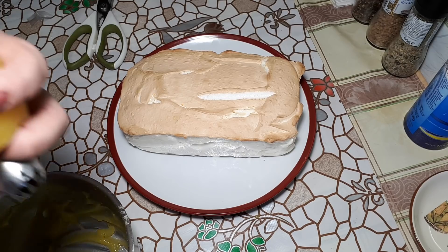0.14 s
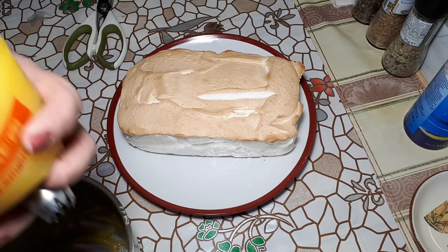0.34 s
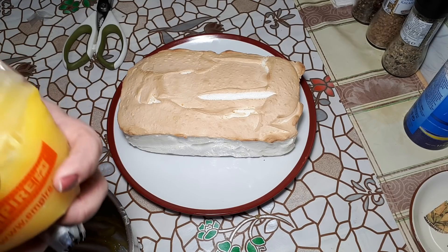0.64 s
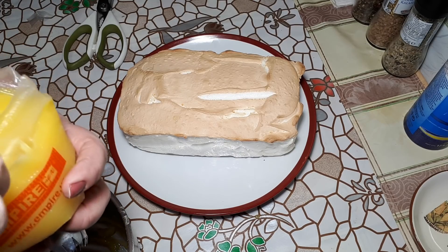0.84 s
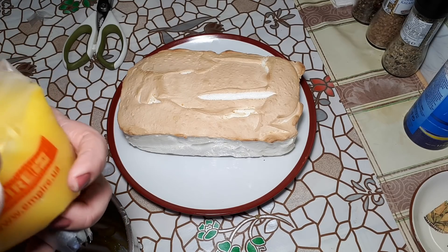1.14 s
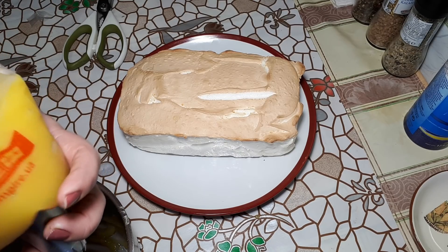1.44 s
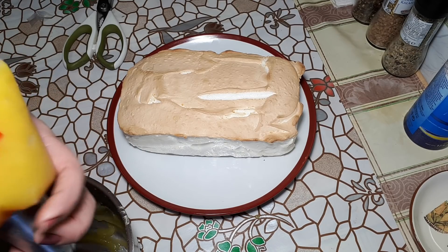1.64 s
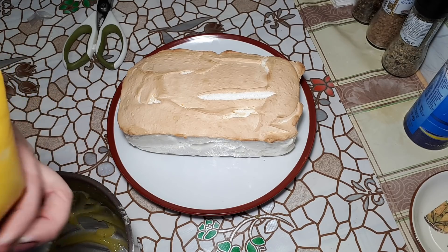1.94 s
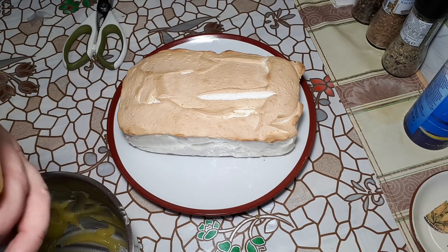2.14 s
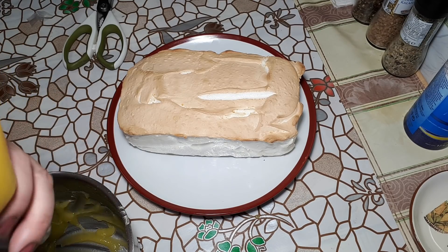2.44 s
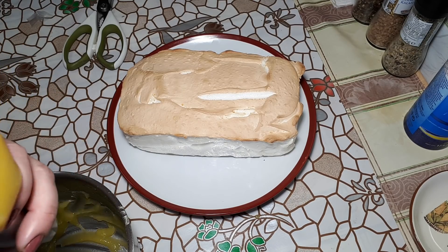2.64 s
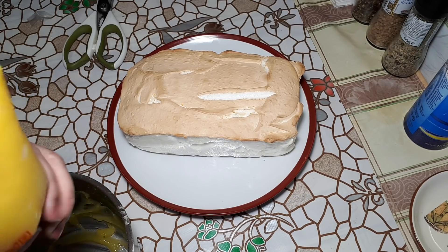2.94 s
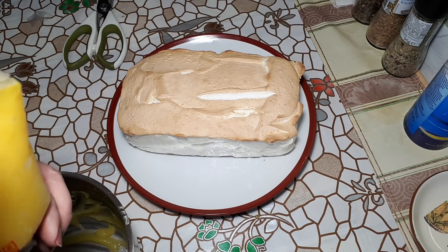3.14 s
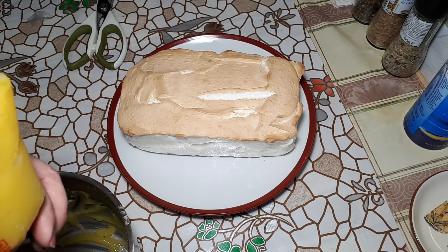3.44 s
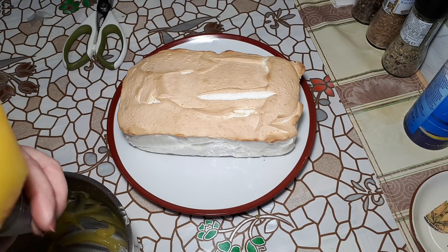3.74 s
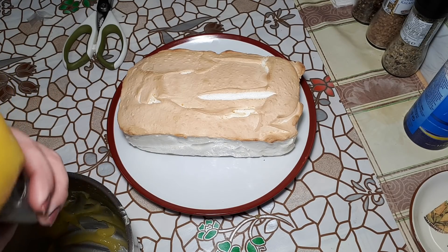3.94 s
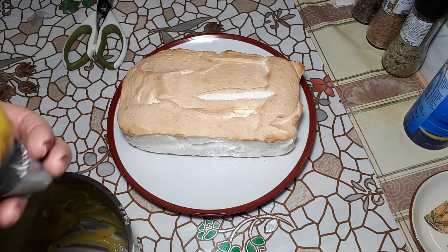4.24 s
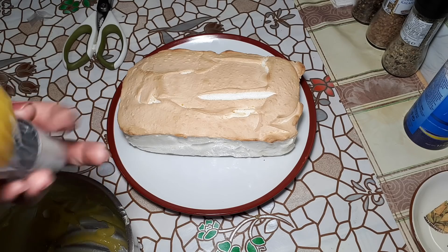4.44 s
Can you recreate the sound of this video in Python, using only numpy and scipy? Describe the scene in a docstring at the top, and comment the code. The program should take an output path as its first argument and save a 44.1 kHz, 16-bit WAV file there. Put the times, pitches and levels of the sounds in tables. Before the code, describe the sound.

Hands work a thin plastic piping bag filled with custard, close to a stereo microphone and slightly left, in a small tiled kitchen. A sharp crunch opens it, scattered ticks follow, then denser crackling builds to firm crunches around three seconds, with busy bright snapping afterwards that eases toward the end. Faint room rumble and hiss lie underneath.

```python
"""Hands squeeze and turn a thin plastic bag full of custard, just left of a pair of microphones in a kitchen.
Creases in the film snap one by one or in dense swarms: each is a burst of noise that rings a patch of film
and scatters off hands and table. The tiled table and the small room throw the sound back as sparse echoes.
A low household rumble with a faint hiss, made of shaped noise, lies underneath."""
import sys
import numpy as np
from scipy import signal
from scipy.fft import rfft, irfft
from scipy.io import wavfile
from scipy.ndimage import uniform_filter1d

SR = 44100
rng = np.random.default_rng(int(sys.argv[2]) if len(sys.argv) > 2 else 0)


def unload_wav(signal):
    """Save mono or channel-first audio to the path in sys.argv[1] as 16-bit WAV at rate SR, clipped to [-1, 1]."""
    wavfile.write(
        sys.argv[1],
        SR,
        np.round(np.clip(np.atleast_2d(signal).T, -1, 1) * 32767).astype(np.int16),
    )


N = 202418

# weight of the low body of the full bag against the film: t/s, level/dB
BODY_WEIGHT = [(0, -9), (.35, -8.5), (.55, -12.5), (.85, -8), (1.25, -5), (1.45, -12.5), (2.0, -9.5),
               (2.85, -9), (2.93, -15.5), (3.02, -11.5), (3.14, -14.5), (3.18, -23), (3.36, -7.5),
               (3.45, -27), (3.53, -15.5), (3.84, -9.5), (4.1, -11.5), (4.25, -10.5), (4.59, -9)]


def gain_of(db):
    """Amplitude factor for a level in dB."""
    return 10 ** (np.asarray(db) / 20)


def evened(x):
    """Scale a signal to an RMS of one."""
    return x / np.sqrt(np.mean(x ** 2) + 1e-20)


def along(curve, s):
    """Read a time curve at s seconds, with straight lines between its points."""
    return np.interp(s, *np.transpose(curve))


def read(points, hz):
    """Read a frequency curve, with straight lines on a log-frequency axis."""
    f, value = np.transpose(points)
    return np.interp(np.log(hz + 1), np.log(f + 1), value)


def shelves(hz, treble_db, thud_db):
    """Smooth lifts of the top and of the bottom of the spectrum, in dB."""
    treble = treble_db / (1 + (6000 / (hz + 1)) ** 6)
    thud = thud_db / (1 + (hz / 1650) ** 5)
    return treble + thud


def coloured(x, db):
    """Causal minimum-phase filter; db is on an even grid from zero to half the sample rate."""
    log_gain = np.log(gain_of(np.maximum(db, -100)))
    circle = np.concatenate([log_gain, log_gain[-2:0:-1]])
    phase = -signal.hilbert(circle).imag
    taps = np.fft.ifft(np.exp(circle + 1j * phase)).real
    return signal.oaconvolve(x, taps[:len(db)])[:len(x)]


def twin(a, b):
    """Film radiates its treble unevenly: mix a and b so the result resembles a less towards the top."""
    # likeness of the two channels: f/Hz, share (0 to 1)
    film_likeness = [(300, 1), (1500, 0.75), (4000, 0.26), (12000, 0.06)]
    same = np.clip(read(film_likeness, np.fft.rfftfreq(len(a), 1 / SR)), 0, 1)
    return irfft(same * rfft(a) + np.sqrt(1 - same ** 2) * rfft(b), len(a))


def snap(hz, treble_db, thud_db, tear_ms, ring_db=6, width=0.14, focus_db=5, bounce_db=-7, bounce_t60=0.032):
    """One crease flips: sharp ticks ring a patch of film, then scatter off hands and table."""
    t = np.arange(1536) / SR
    tick_a, tick_b, bounce_a, bounce_b, slip = rng.standard_normal((len(t), 5)).T

    tear = t / (np.clip(tear_ms, .1, 30) / 1000)
    swell = tear * np.exp(-tear ** 1.4)  # the tear gathers, then stops short
    shape = swell * abs(slip) ** .8  # some slips are far larger than the rest
    dying = gain_of(-60 * t / bounce_t60) * np.minimum(t / 0.0065, 1)
    dying = dying / np.linalg.norm(dying)

    f = np.fft.rfftfreq(512, 1 / SR)
    away = np.log((f + 1) / hz)
    patch = ring_db * np.exp(-.5 * (away / width) ** 2) + shelves(f, treble_db, thud_db)
    patch += focus_db * np.exp(-.5 * (away / 0.83) ** 2)  # a wide band around the ring sounds along
    # each snap made here gets its own random ripple of colour
    patch += 2.9 * evened(uniform_filter1d(rng.standard_normal(len(f)), size=9))

    left = (shape * tick_a, bounce_a)
    right = (shape * twin(tick_a, tick_b), twin(bounce_a, bounce_b))
    pair = []
    for direct, scatter in (left, right):
        scatter = gain_of(bounce_db) * scatter * dying
        bounced = signal.fftconvolve(direct, scatter)[:len(t)]
        sound = coloured(direct + bounced, patch)
        pair.append(sound / np.linalg.norm(sound))
    fade_out = signal.windows.tukey(2 * len(t), .3)[len(t):]
    return np.array(pair) * fade_out


def heard(x):
    """Film colour and resonances, the colour of each port, and the later arrival at the right one."""
    # overall colour of the film: f/Hz, level/dB
    film_colour = [(88, -72.5), (150, -19), (354, -17.5), (534, -9.5), (960, -6), (1830, -3.5),
                   (2220, -5.5), (2650, -0.5), (5460, -6), (7470, -5.5), (9080, -11), (15100, -7.5),
                   (16000, -44)]
    # resonances of bag and table: f/Hz, width/Hz, boost/dB
    resonances = [(510, 335, 5.5), (1850, 910, 6), (2520, 150, 3.5), (4690, 1300, 5.5), (7520, 300, 4)]
    # the two microphone ports differ in colour: f/Hz, left minus right/dB
    port_lean = [(60, -23), (110, 8.5), (200, -0.5), (380, 12), (700, -1), (1290, 0.5), (2380, 1),
                 (4400, 1), (8120, -2), (15000, 2.5)]
    hz = np.fft.rfftfreq(4096, 1 / SR)
    db = read(film_colour, hz)
    for f, w, boost in resonances:
        db = db + boost / (1 + (2 * (hz - f) / w) ** 2)
    half_lean = read(port_lean, hz) / 2
    left = coloured(x[0], db + half_lean)
    right = coloured(x[1], db - half_lean)
    right_late = 13  # samples
    return np.array([left, np.pad(right, (right_late, 0))[:N]])


def rustle(count=40):
    """Many small creases at random moments, in clumps; a firm grip packs them into a dense crunch."""
    # how hard the fingers work the film, as swarm level ahead of the tone lifts: t/s, level/dB
    grip_curve = [(0.0, -32.5), (0.16, -56.5), (0.3, -41), (0.46, -68.5), (0.66, -60.5), (0.8, -48),
                  (0.9, -53), (1.12, -43), (1.2, -55), (1.34, -75), (1.54, -65.5), (1.66, -50), (1.84, -52),
                  (1.98, -54.5), (2.12, -47), (2.26, -50.5), (2.38, -41.5), (2.5, -44.5), (2.57, -41),
                  (2.7, -48.5), (2.717, -31.5), (2.84, -38), (2.89, -45.5), (2.96, -42), (3.01, -29.5),
                  (3.14, -30.5), (3.18, -39), (3.27, -41.5), (3.31, -54.5), (3.46, -49.5), (3.52, -34),
                  (3.7, -39.5), (3.75, -43.5), (3.84, -38), (3.89, -47.5), (4.2, -49.5), (4.27, -53),
                  (4.5, -49.5), (4.59, -54)]
    # treble and thud at which the film colour holds as it is: treble/dB, thud/dB
    usual_treble_db, usual_thud_db = (-5, -11)

    grip_db = along(grip_curve, np.arange(N) / SR)
    # mean creases per second: 600 at a -47 dB grip, more as the grip gets louder
    rate = np.clip(600 * np.exp(0.12 * (grip_db + 47.0)), 100, 15000)
    drift = uniform_filter1d(uniform_filter1d(rng.standard_normal(N), 350), 350)
    clumps = gain_of(5.5 * evened(drift))
    comes = rng.random(N) < rate / SR * clumps / clumps.mean()
    size_db = 3 * np.minimum(rng.exponential(1, N), 3.5)  # mostly small, a few large
    size = comes * gain_of(size_db) * rng.choice([-1, 1], N)
    size = size / np.sqrt(rate)  # more creases share the same energy

    # the creases share a stock of snap sounds
    kind, out = rng.integers(0, count, N), np.zeros((2, N))
    for k, hz in enumerate(np.geomspace(500, 12000, count)):
        one = snap(hz, 11.7 * rng.standard_normal(), 0, rng.uniform(0.56, 2.33), ring_db=4.5)
        both = signal.oaconvolve((size * (kind == k))[None], one, axes=1)
        out += both[:, 256:N + 256]  # the swarm is already under way at the start

    hz, frames, z = signal.stft(evened(heard(out)), SR, nperseg=256)
    hz = hz[:, None]
    level_db = along(grip_curve, frames)
    treble_db = -0.5 + 0.18 * (level_db + 45)  # a firmer grip is brighter
    thud_db = along(BODY_WEIGHT, frames)
    lift = shelves(hz, treble_db - usual_treble_db, thud_db - usual_thud_db)
    lift += 0.57 * (level_db + 38.0) / (1 + (hz / 330) ** 6)  # a hard squeeze moves the custard
    swarm = signal.istft(z * gain_of(lift), SR, nperseg=256)[1][:, :N]
    return swarm * gain_of(grip_db)


def hush():
    """Low rumble of the house over a faint hiss: steady noise, most alike in both channels near 100 Hz."""
    # spectrum ahead of the overall level: f/Hz, level/dB
    rumble_colour = [(20, -17), (60, -10), (100, 4.5), (170, -7), (400, -9.5), (2000, -17.5), (8000, -17.5),
                     (16000, -29.5)]
    # likeness of the two channels: f/Hz, share (-1 to 1)
    rumble_likeness = [(30, .35), (100, 0.69), (600, .1)]
    hz = np.fft.rfftfreq(2048, 1 / SR)
    a, b, c, d = rng.standard_normal((N // 512 + 5, len(hz), 4)).T
    same = np.clip(read(rumble_likeness, hz), -1, 1)[:, None]
    left = a + 1j * b
    right = same * left + np.sqrt(1 - same ** 2) * (c + 1j * d)
    z = np.array([left, right]) * gain_of(read(rumble_colour, hz))[:, None]
    noise = signal.istft(z, nperseg=2048, noverlap=1536)[1][:, :N]
    return gain_of(-68) * evened(noise)


def snaps():
    """Single creases, from loud snaps to faint ticks in the lulls; a longer tear carries more energy."""
    # single creases, level ahead of tear energy and film colour:
    # t/s, level/dB, pitch of the film patch f/Hz, treble/dB, length of the tear/ms
    single_creases = [(0.0078, -17, 1710, 2.5, 1.4), (0.015, -24, 1850, -2, 1.1),
                      (0.0703, -31.5, 1750, -12, 2.6), (0.0953, -26.5, 1630, 3, 0.31),
                      (0.123, -36, 1570, -28, 0.7), (0.183, -35, 1770, -6, 1.9),
                      (0.2054, -31.5, 2470, -4.5, 1.9), (0.2134, -30.5, 2560, -3, 0.6),
                      (0.2347, -26, 2370, 1, 3), (0.2621, -21.5, 2400, 8, 2.3), (0.293, -36, 7450, 6, 3.6),
                      (0.333, -27.5, 1630, 4, 1.5), (0.3514, -16, 1820, 3, 0.31),
                      (0.3618, -30, 7840, -11, 1.6), (0.4128, -26.5, 7440, 0.5, 1.44),
                      (0.442, -46, 1590, -34, 2.6), (0.483, -46.5, 1850, -50, 1.7),
                      (0.524, -38.5, 2640, 8, 3), (0.532, -23, 2540, -2, 0.36),
                      (0.5438, -39, 3300, -2, 0.75), (0.5832, -27.5, 3620, -4, 1.02),
                      (0.6166, -47.5, 1820, -25, 2.4), (0.6766, -37.5, 1550, -3, 7.3),
                      (0.7412, -40.5, 7540, -1, 3.1), (0.775, -32, 1900, -3, 0.99),
                      (0.839, -35.5, 4830, 0, 2.3), (0.8633, -39, 1770, 1.5, 6.7),
                      (0.901, -39, 3320, 2, 3.2), (0.943, -36.5, 2870, 4, 2.8),
                      (0.9643, -32, 3330, -2, 1.3), (0.9725, -32, 4690, 2.5, 6.4),
                      (1.0454, -29.5, 4160, 8, 0.96), (1.0829, -27, 4200, -1, 0.48),
                      (1.0896, -27.5, 1810, 1, 2.3), (1.1233, -32.5, 1570, 0.5, 5.1),
                      (1.1492, -40, 2880, -12, 0.92), (1.2217, -39.5, 2900, -4, 1.7),
                      (1.261, -36, 3220, -3.5, 4), (1.382, -45, 7100, -3, 0.94),
                      (1.4212, -35, 7600, -1, 1.24), (1.4677, -37.5, 7450, 21, 0.35),
                      (1.496, -66, 2500, -15, 4), (1.544, -59, 1890, -22, 2.1), (1.595, -36, 3150, -6, 2.4),
                      (1.629, -40.5, 4470, -4, 4.3), (1.6544, -35, 4130, -10.5, 0.85),
                      (1.6814, -31, 1850, -3, 0.45), (1.7328, -38, 4680, -3, 1.6),
                      (1.7681, -30, 3270, -12, 0.41), (1.781, -27, 12300, 8, 0.59),
                      (1.8243, -28.5, 1950, 1.5, 1.7), (1.8732, -38, 10680, -3.5, 4.5),
                      (1.946, -40, 2520, -2, 2.6), (2.0016, -54, 600, -22, 4.1),
                      (2.0184, -41, 1700, -24, 0.63), (2.0418, -30.5, 1850, -1.5, 1.06),
                      (2.1058, -18.5, 4970, 6.5, 0.4), (2.1919, -30, 2420, 14, 2.3),
                      (2.2309, -39, 2370, -24, 1.9), (2.2395, -41, 2220, -10, 0.75),
                      (2.2546, -42, 2110, -1, 2.3), (2.282, -28, 7600, 3, 0.7), (2.296, -30, 7490, 12, 1.3),
                      (2.3071, -25.5, 4670, 3.5, 1.4), (2.3108, -23, 2200, 3.5, 4.2),
                      (2.3268, -26, 950, -17, 0.77), (2.3911, -21, 8200, 1, 0.47),
                      (2.4475, -25.5, 3150, -5, 1.04), (2.4515, -23.5, 2440, 1, 0.56),
                      (2.5581, -33.5, 1920, -6, 3.9), (2.5904, -33, 1800, -42, 0.52),
                      (2.623, -33.5, 2500, 2, 2.1), (2.6492, -35.5, 2070, -22, 1.1),
                      (2.6744, -29.5, 3930, 0.5, 2), (2.7126, -24.5, 2630, -14, 1),
                      (2.7296, -26.5, 2120, -2, 2.9), (2.7739, -39, 2770, -26, 3),
                      (2.8123, -23.5, 2670, -6, 1.1), (2.871, -38.5, 3340, -3, 4.3),
                      (2.9049, -39, 2580, -13, 1), (2.9264, -27.5, 1970, -4.5, 1.1),
                      (2.9333, -31.5, 1960, -0.5, 2.4), (3.005, -27, 2470, -32, 3.1),
                      (3.0474, -26, 2610, -6.5, 4.3), (3.0747, -21, 7640, -16, 2.1),
                      (3.1357, -18, 3380, -1, 0.7), (3.2564, -27.5, 1850, -4, 0.84),
                      (3.307, -36, 7800, -12.5, 1.9), (3.349, -41, 3430, -4, 1.8),
                      (3.3711, -38.5, 3930, -1.5, 2.1), (3.4044, -32.5, 2700, -4, 0.83),
                      (3.43, -32.5, 7200, -3, 2.5), (3.4814, -29.5, 2610, -4, 2.6),
                      (3.5176, -20.5, 4140, 7, 0.97), (3.5343, -21.5, 11300, 6, 3.9),
                      (3.555, -28, 7700, 2, 2.4), (3.5662, -31, 3600, -2, 1.5), (3.5825, -27.5, 6740, 2, 2),
                      (3.594, -28, 3640, 9, 5.9), (3.631, -32, 6050, 1, 2.8),
                      (3.6609, -22.5, 4430, 0.5, 1.9), (3.6762, -29.5, 2730, -0.5, 5.2),
                      (3.698, -22, 2180, -3, 1.6), (3.754, -32, 4760, -1, 1.2),
                      (3.7882, -24, 1670, 16, 1.3), (3.818, -23, 7340, 20, 1), (3.8306, -23, 5700, -2, 0.5),
                      (3.7998, -30.5, 3420, 0, 1), (3.8547, -25, 2680, 5, 1.6),
                      (3.9026, -29.5, 5860, -2.5, 2.5), (3.909, -30, 8300, -2, 4.5),
                      (3.936, -29, 8050, -4, 0.67), (3.9573, -26, 3600, 0, 1.4),
                      (3.9659, -25, 1590, 0.5, 3.1), (4.0118, -34.5, 1870, -2.5, 5.3),
                      (4.0167, -26, 7560, 0, 0.7), (4.033, -30.5, 2220, -1, 3.7),
                      (4.0786, -26.5, 1600, -1.5, 1.24), (4.115, -32.5, 1760, 2, 3.3),
                      (4.1778, -25, 7350, -3, 0.68), (4.1947, -29, 1680, -2, 1.34),
                      (4.212, -30, 3520, 14, 1.8), (4.244, -42.5, 4940, 3, 2.2),
                      (4.2954, -37, 2550, -3.5, 1.7), (4.3158, -26.5, 1820, -4.5, 0.2),
                      (4.347, -34.5, 7900, -1, 2.4), (4.363, -33.5, 6050, -6, 0.91),
                      (4.3903, -29.5, 7640, 8, 2.8), (4.4175, -31.5, 8000, 19, 2.8),
                      (4.446, -28.5, 4400, 13, 2.5), (4.472, -30, 5000, 12, 1.6),
                      (4.498, -28.5, 4400, 2, 1.9), (4.506, -31.5, 2050, -7.5, 1.18),
                      (4.5275, -34, 5100, 5, 1.7), (4.5412, -33.5, 7040, -4, 1.6),
                      (4.5575, -39, 2840, -1.5, 1)]
    # treble and thud at which the film colour holds as it is: treble/dB, thud/dB
    usual_treble_db, usual_thud_db = (-7.5, -8.5)
    out = np.zeros((2, N + 1536))
    for s, db, hz, treble_db, tear_ms in single_creases:
        thud_db = along(BODY_WEIGHT, s) - usual_thud_db
        one = snap(hz, treble_db - usual_treble_db, thud_db, tear_ms)
        at = round(s * SR)
        out[:, at:at + 1536] += one * gain_of(db) * np.sqrt(90 + 110 * abs(tear_ms))
    return heard(out[:, :N])


def kitchen(x):
    """Sparse echoes of random sign from 8 ms on, each band dying at its own speed."""
    # decay of the room by 60 dB: f/Hz, t60/s
    room_decay = [(300, .22), (1500, .2), (5000, .16), (14000, .11)]
    taps = np.zeros((2, SR // 2))
    starts = np.arange(350, SR // 2 - 20, 20)  # one echo in every 20 samples
    at = starts + rng.integers(0, 20, (2, len(starts)))
    np.put_along_axis(taps, at, rng.choice([-1., 1.], at.shape), 1)
    hz, t, z = signal.stft(taps, SR, nperseg=256)
    decay_db = -60 * t / read(room_decay, hz)[:, None]
    tail = signal.istft(z * gain_of(decay_db), SR, nperseg=256)[1]
    return signal.fftconvolve(x, tail / np.linalg.norm(tail[0]), axes=1)[:, :N]


def scene():
    """The bag, its echoes 10 dB down, and the house behind it."""
    bag = snaps() + rustle()
    return bag + gain_of(-10) * kitchen(bag) + hush()


def record(dry):
    """The band limit of the recorder: a steep low-pass at 15950 Hz."""
    band_limit = signal.firwin(511, 15950, window=("kaiser", 9), fs=SR)
    return signal.oaconvolve(dry, band_limit[None], "same")


dry = scene()
out = record(dry)
unload_wav(out)
```